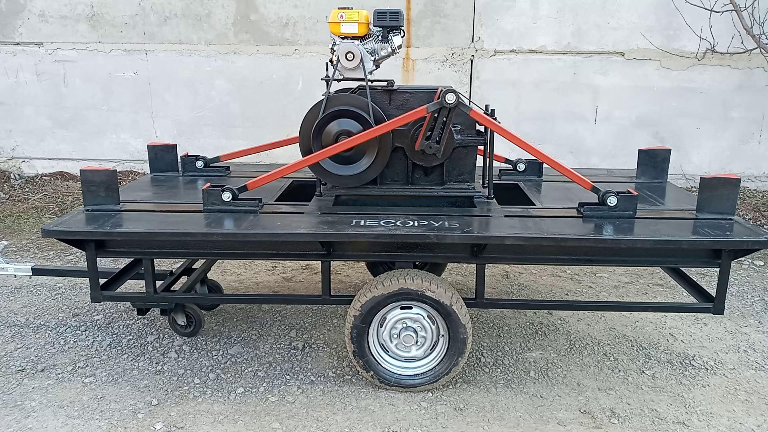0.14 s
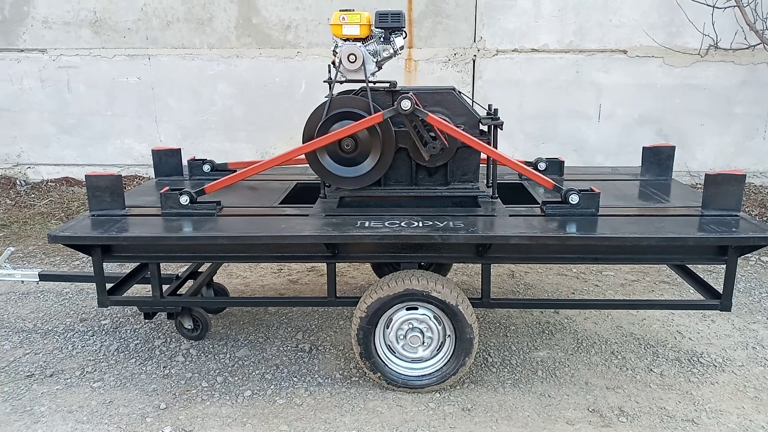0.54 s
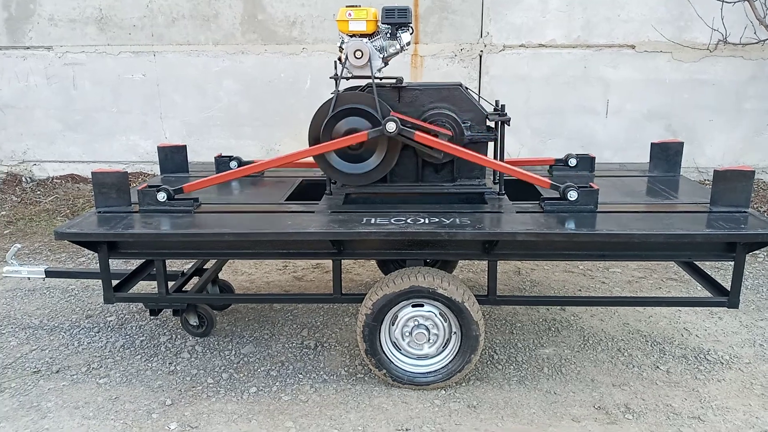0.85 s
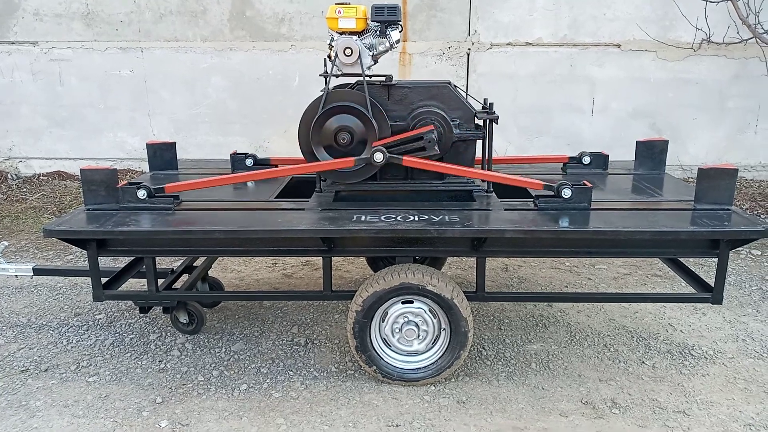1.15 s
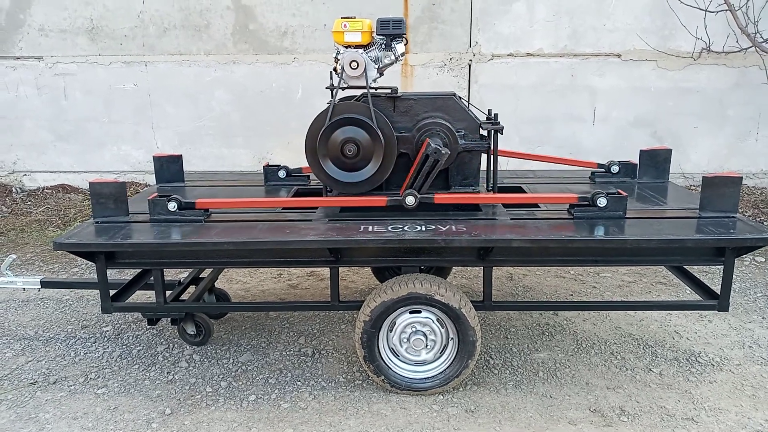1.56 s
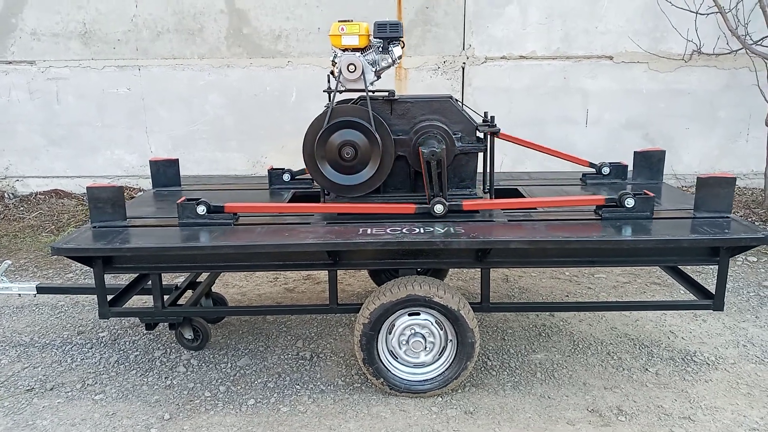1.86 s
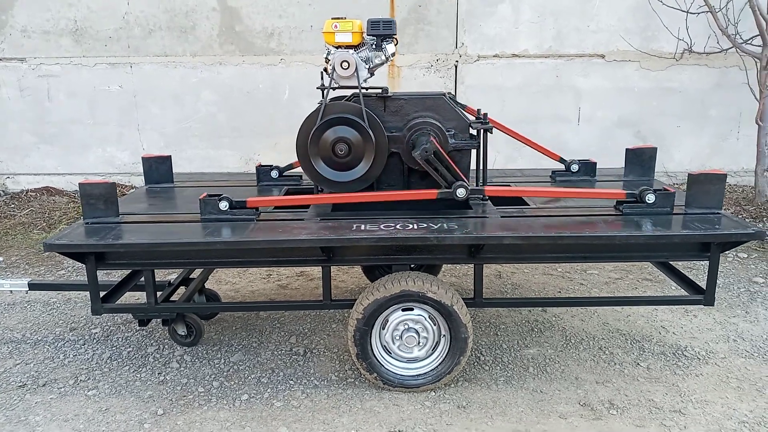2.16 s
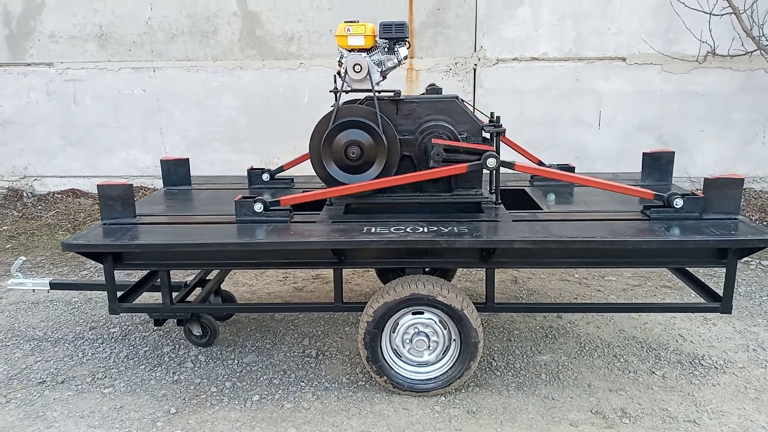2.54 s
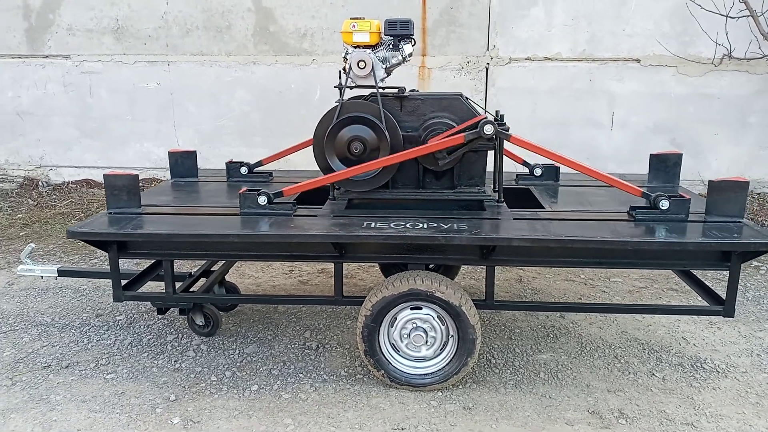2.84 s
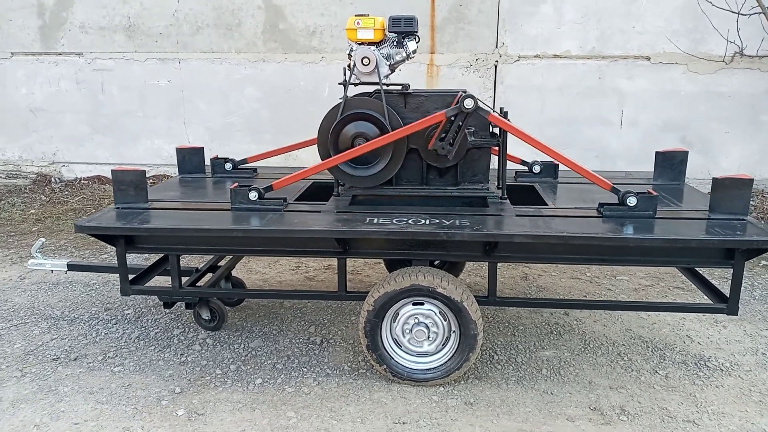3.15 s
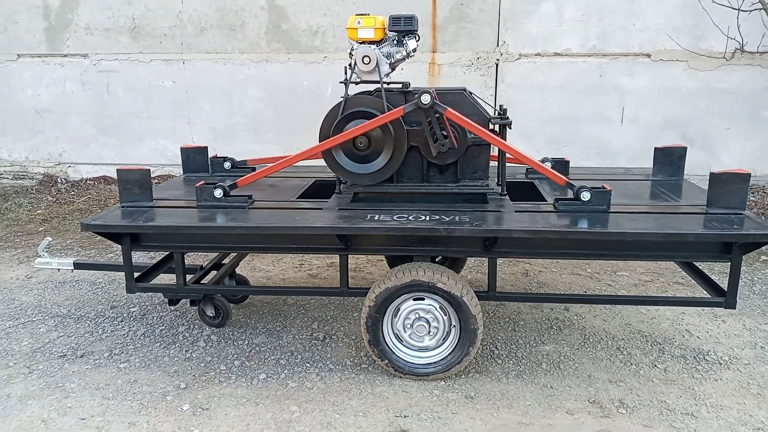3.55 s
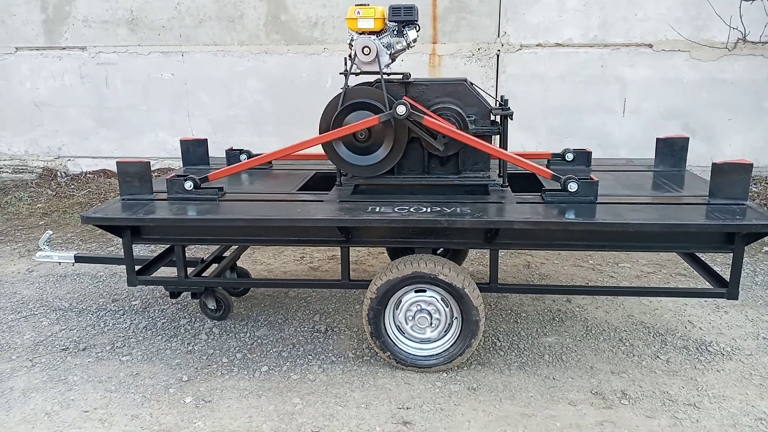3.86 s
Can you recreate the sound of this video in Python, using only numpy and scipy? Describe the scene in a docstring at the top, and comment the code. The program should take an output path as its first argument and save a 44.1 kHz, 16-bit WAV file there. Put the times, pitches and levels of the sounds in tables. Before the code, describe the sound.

A small single-cylinder engine fades in after a brief silence and runs at a fast, even idle, about twenty chugs a second, with metallic knocking, ticking and whirring; close stereo microphone in an open yard.

```python
"""A single-cylinder four-stroke engine at fast idle on a wood splitter fades in near a concrete wall.
Each cycle sums decaying noise bursts (piston knock, valve ticks, shroud buzz) and resonant exhaust puffs with
a wall echo, over filtered-noise rumble and whir and sinusoidal gear tones. Low noise gusts come from 0.84 s and
harder piston slaps from 1.16 s; rams rub as narrow-band noise at 1.68 and 2.17 s; the shroud's buzz is
strongest near 2.8 s, and a pulse rings the deck in a thud at 2.97 s."""
import sys
import numpy as np
from scipy import signal
from scipy.fft import rfft, irfft
from scipy.io import wavfile
from scipy.ndimage import uniform_filter1d

SR = 44100
rng = np.random.default_rng(int(sys.argv[2]) if len(sys.argv) > 2 else 0)


def put_to_file(sound):
    """Save the sound as 16-bit audio at rate SR, in the file named by the first command-line argument."""
    columns = np.atleast_2d(sound).T  # one column per channel
    safe = np.clip(columns, -1, 1)
    whole_steps = np.round(safe * 32767)
    wavfile.write(sys.argv[1], SR, whole_steps.astype(np.int16))


N = 176400
T = np.arange(N) / SR  # time (s)
REFERENCE_FIRING_S, CYCLE_HZ, SAG_HZ_PER_S = .6142, 19.828, .0675
RISE_MS = 0.63  # onset time constant of the knocks, ticks, buzzes and slaps


def undb(db):
    """Amplitude ratio: every 20 dB is a factor of ten."""
    return 10 ** (np.asarray(db) / 20)


def level(x, db):
    """Root-mean-square normalisation to a level in dB."""
    return x * undb(db) / np.sqrt(np.mean(x ** 2))


def noise():
    """White noise: equal mean power at all frequencies."""
    return rng.standard_normal(N)


def walk(rate):
    """Low-pass random fluctuation of unit spread: held random values, smoothed twice."""
    hold = int(SR / rate)
    steps = np.repeat(noise()[:N // hold + 1], hold)
    drift = uniform_filter1d(uniform_filter1d(steps, hold), hold)[:N]
    return drift / drift.std()


def colour(x, points):
    """Linear filtering by a spectral gain curve of (Hz, dB) points on a log-frequency axis."""
    hz, db = np.array(points).T
    f = np.maximum(np.fft.rfftfreq(N, 1 / SR), 1)
    gain = undb(np.interp(np.log(f), np.log(hz), db))
    return irfft(rfft(x) * gain, N)


def ring(x, modes):
    """Modal superposition: parallel resonators (Hz, width Hz, dB) answer one excitation."""
    out = 0
    for hz, width, db in modes:
        b, a = signal.iirpeak(hz, hz / width, fs=SR)
        out = out + undb(db) * signal.lfilter(b, a, x)
    return out


def bump(at, length):
    """Gaussian envelope: unity at its centre, 1/e at one length (s) to either side."""
    return np.exp(-((T - at) / length) ** 2)


def cycles():
    """Phase as the integral of frequency: engine cycles from a reference firing, slowing slightly."""
    t = T - REFERENCE_FIRING_S
    return CYCLE_HZ * t - SAG_HZ_PER_S * t ** 2 / 2


def strikes(offset_ms, scatter_db, jitter_ms):
    """Quasi-periodic excitation: one impulse a cycle, uneven in strength and timing."""
    turn = cycles()
    times = np.interp(np.arange(np.ceil(turn[0]), turn[-1]), turn, T)
    chance = rng.standard_normal((len(times), 2))
    shift_ms = offset_ms + jitter_ms * chance[:, 0]
    at = ((times + shift_ms / 1000) * SR).astype(int)
    inside = (at >= 0) & (at < N)
    strength = undb(scatter_db * np.clip(chance[inside, 1], -1.5, 1.5))
    return np.bincount(at[inside], strength, N)


def clatter(blows, scatter_db, jitter_ms):
    """Impact noise: each blow is a decaying grainy burst, partly the same on every cycle."""
    repeat_share, grain_db = .2, 2.2  # power share of the repeated burst; level spread of the fresh grain
    ms = T[:SR // 20] * 1000
    out = 0
    for offset_ms, db, decay_ms in blows:
        hits = strikes(offset_ms, scatter_db, jitter_ms)
        shape = np.exp(-ms / decay_ms) * (1 - np.exp(-ms / RISE_MS))
        grain = level(noise() * undb(grain_db * walk(1500)), 0)
        fresh = signal.fftconvolve(hits, shape)[:N] * grain
        same = signal.fftconvolve(hits, shape * noise()[:len(ms)])[:N]
        out = out + undb(db) * (np.sqrt(1 - repeat_share) * fresh + np.sqrt(repeat_share) * same)
    return out


def gusts():
    """Wind noise of partial coherence: low buffets half shared by two sides, breeze separate on each."""
    # low buffets on the microphone: t/s, length/s, level/dB
    buffets = [(.84, 0.042, -25.5), (1.264, .04, -38.5), (1.59, 0.027, -23), (2.003, 0.031, -16.5),
               (2.15, 0.056, -36)]
    # spectrum of the wind noise: f/Hz, level/dB
    wind_colour = [(20, -30), (45, -12), (85, -1), (160, -3), (300, -7.5), (700, -28), (3000, -72)]
    breeze_db, shared = -32, 0.45  # shared: the part of the gust power common to both sides
    swell = sum(undb(db) * bump(at, length) for at, length, db in buffets)
    both, *own = (level(colour(noise(), wind_colour), 0) for _ in range(3))
    common = swell * np.sqrt(shared) * both
    return common + (swell * np.sqrt(1 - shared) + undb(breeze_db)) * np.array(own)


def whir():
    """Broadband flow noise under random amplitude modulation: the fluttering rush of fan and belt."""
    # spectrum of fan, belt and gearbox: f/Hz, level/dB
    rush_colour = [(150, -24), (400, 2.5), (620, 3.5), (780, 1), (1050, 4), (1400, 3), (1900, 1),
                   (2400, -5.5), (3200, -3.5), (4000, -9), (5100, -7.5), (5600, -10), (6400, -1.5),
                   (7200, -2), (8300, -18), (10200, -18), (12300, -31), (13900, -19), (14800, -14),
                   (16000, -51)]
    flutter_db = 1.4
    return level(colour(noise() * undb(flutter_db * walk(250)), rush_colour), -26.5)


def diffuse():
    """Diffuse field: whir and ticking that reach one side from all over the yard."""
    # whir that fills the yard, relative to the direct whir: f/Hz, level/dB
    yard_colour = [(100, -11), (600, -9), (1200, -9), (2500, 3), (7000, 0), (15000, -8.5)]
    return colour(whir(), yard_colour) + undb(-7) * ticks()


def gear_tones():
    """Order-locked tones: sinusoids at multiples of the cycle rate, wavering in phase and level."""
    # multiples of the cycle rate [1]
    orders = [45, 48, 52, 95]
    # mean level of each tone: level/dB
    tone_db = [-40.5, -43, -41, -46]
    out = 0
    for order, db in zip(orders, tone_db):
        phase = 2 * np.pi * order * cycles() + 0.67 * walk(14)
        out = out + level(np.sin(phase) * undb(1.75 * walk(12)), db)
    return out


def ram_rubs():
    """Friction noise in resonance: narrow-band bursts as a ram rubs in its guide."""
    # rubs: t/s, length/s, f/Hz, level at the centre/dB
    rubbing = [(1.68, .04, 680, -28.5), (2.165, 0.03, 623, -18.5)]
    out = 0
    for at, length, hz, db in rubbing:
        mode = [(hz, 130, 0)]
        scrape = ring(ring(noise(), mode), mode)
        out = out + level(scrape, db) * bump(at, length)
    return out


def thuds():
    """Modal response to a short force pulse: slack in the crank linkage thuds into the steel deck."""
    # blows on the deck: t/s, peak level/dB
    deck_blows = [(2.967, -9)]
    # deck resonances: f/Hz, width/Hz, level/dB
    deck_modes = [(110, 36, -2), (181, 44, 2)]
    out = 0
    for at, db in deck_blows:
        blow = ring(bump(at, 0.00086), deck_modes)
        out = out + undb(db) * blow / np.abs(blow).max()
    return out


def shroud_buzz():
    """Modal radiation from thin sheet: the tin shroud buzzes once per crank turn."""
    # two buzzes of a cycle: t after firing/ms, level/dB, decay/ms
    rattles = [(-1, -0.5, 8.6), (21, -4.5, 16.4)]
    # shroud resonances: f/Hz, width/Hz, level/dB
    shroud_modes = [(1046, 70, 3), (1937, 197, 3.5), (1996, 300, -17)]
    # the buzz swells and eases: t/s, relative level/dB
    swell = [(.5, -2), (1.8, -1), (2.3, -1.5), (2.8, 1.5), (3.9, -2)]
    at, db = np.array(swell).T
    buzz = ring(clatter(rattles, scatter_db=1.5, jitter_ms=0.17), shroud_modes)
    return level(buzz * undb(np.interp(T, at, db)), -30)


def ticks():
    """Broadband impact radiation: short contacts in the valve gear make a bright tapping."""
    # valve gear ticks of a cycle: t after firing/ms, level/dB, decay/ms
    taps = [(-12.4, 3, 4), (1.5, 0, 5.8), (11.5, -1.5, 7.1)]
    # spectrum of the tapping: f/Hz, level/dB
    tap_colour = [(1000, -46), (4000, -0.5), (5800, -25), (7100, -1.5), (8200, -4.5), (9200, -7.5),
                  (10200, -7.5), (12300, -10), (13700, -23), (14800, 7.5), (16000, -2)]
    return level(colour(clatter(taps, scatter_db=1.2, jitter_ms=.4), tap_colour), -33)


def crankcase(x):
    """Structural resonance: the cast block rings in its modes."""
    # crankcase resonances: f/Hz, width/Hz, level/dB
    case_modes = [(1163, 330, -1.5), (1706, 510, 2.5), (2160, 73, 11), (2446, 370, 1.5), (2983, 730, 1.5),
                  (4297, 176, -2), (4995, 310, -3), (5390, 470, -5.5), (6246, 1080, 1), (6660, 200, -5.5)]
    return colour(ring(x, case_modes), [(500, 1.5), (7300, 2), (8800, -11.5), (13000, -8.5)])


def slaps():
    """Transient excitation: single hard slaps of the piston, each a short noise crack."""
    # harder slaps: t/s, relative level/dB
    cracks = [(1.1623, -15), (1.215, -12), (1.3647, -14.5), (1.5658, -12.5), (1.77, -16), (1.8695, -14.5),
              (1.9718, -15), (2.5305, -16), (2.888, -15.5), (3.1906, -14.5), (3.241, -18), (3.3448, -18.5),
              (3.4461, -18.5), (3.7998, -17)]
    decay_ms = 3.3
    shape = 0
    for at, db in cracks:
        ms = np.maximum(T - at, 0) * 1000
        shape = shape + undb(db) * np.exp(-ms / decay_ms) * (1 - np.exp(-ms / RISE_MS))
    return shape * noise()


def piston_knock():
    """Structure-borne impact sound: regular knocks and rarer slaps drive the crankcase modes."""
    # blows on the crankcase in a cycle: t after firing/ms, level/dB, decay/ms
    knocks = [(-7.5, 2, 5.8), (-0.5, -13.5, 11), (10, -9.5, 13)]
    regular = level(crankcase(clatter(knocks, scatter_db=1.0, jitter_ms=0.28)), -25.5)
    slap = colour(crankcase(slaps()), [(1000, -11.5), (4500, 3.5), (7000, -3), (15000, -8)])
    return regular + level(slap, -34.5)


def exhaust():
    """Pulse-excited cavity resonance: gas puffs ring the muffler and echo, over turbulent rumble."""
    # gas puffs of a cycle: t after firing/ms, level/dB
    puff_table = [(-2.0, -13.5), (4, 0.5)]
    # muffler and deck resonances: f/Hz, width/Hz, level/dB
    muffler_modes = [(95.5, 15, -3), (179.4, 7.9, 1), (195, 85, -6), (242, 39.5, -5), (432, 20, -0.5),
                     (608, 70, -18)]
    # spectrum of turbulent exhaust and shaking deck: f/Hz, level/dB
    rumble_colour = [(25, -34), (45, -49), (65, -15), (100, -8.5), (170, 2), (270, 1.5), (350, -12.5),
                     (600, -9), (900, -23), (3000, -44)]
    wall_ms, wall_db = 20.2, -12  # delay and level of the concrete wall's echo
    puffs = sum(undb(db) * strikes(ms, scatter_db=0.85, jitter_ms=0.17) for ms, db in puff_table)
    thump = ring(puffs, muffler_modes)
    thump = colour(thump, [(30, -51), (80, 0), (290, -1), (380, -12), (700, -10), (2000, -40)])
    thump = thump + undb(wall_db) * np.interp(T - wall_ms / 1000, T, thump)
    return level(thump, -22.5) + level(colour(noise(), rumble_colour), -21.5)


def yard(x):
    """Multiple scattering: direct sound plus a short decaying spray from trailer and ground."""
    # scattered sound relative to the direct: f/Hz, level/dB
    scatter = [(60, -48), (250, -22), (600, -11.5), (1200, -2.5), (2500, -0.5), (7000, -1), (15000, -1)]
    decay_s = .008
    t = T[:SR // 8]
    spray = noise()[:len(t)] * np.exp(-t / decay_s)
    scattered = colour(signal.fftconvolve(x, spray / np.linalg.norm(spray))[:N], scatter)
    # compensate for the power that scattering adds
    makeup = [(hz, -10 * np.log10(1 + undb(db) ** 2)) for hz, db in scatter]
    return colour(x + scattered, makeup)


def scene():
    """Stereo level and time difference between the two channels: the right is equalised and leads."""
    # left relative to right: f/Hz, level/dB
    left_over_right = [(60, 6.5), (500, 2), (1000, 3), (2000, 7.5), (4300, 4), (7000, 13), (8500, 5.5),
                       (10500, -5), (12500, 1.5), (15000, 13)]
    left_lag_ms = .93
    parts = [exhaust(), piston_knock(), ticks(), shroud_buzz()]
    direct = whir() + gear_tones() + ram_rubs() + thuds()
    # each part has its own reflections on each side
    left, right = (sum(yard(x) for x in parts) + direct + diffuse() + wind for wind in gusts())
    right = colour(right, [(hz, -db) for hz, db in left_over_right])
    return np.array([left, np.roll(right, -round(left_lag_ms * SR / 1000))])


def record(dry):
    """Envelope and band limitation: a fade-in from silence, then a steep low-pass filter."""
    # fade-in: t/s, level/dB
    fade = [(.411, -70), (.415, -21), (.445, -18), (.47, -11), (.51, -7.5), (.58, -4.5), (.68, -1.2),
            (1.7, 0)]
    at, db = np.array(fade).T
    faded = dry * undb(np.interp(T, at, db)) * (T > at[0])
    top_hz = 15750
    return signal.sosfilt(signal.ellip(10, .2, 80, top_hz, fs=SR, output="sos"), faded)


dry = scene()
out = record(dry)
put_to_file(out)
```